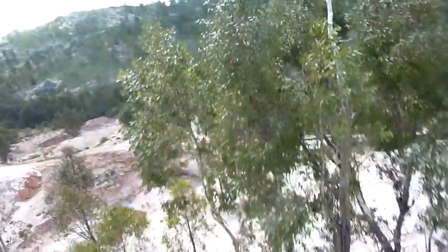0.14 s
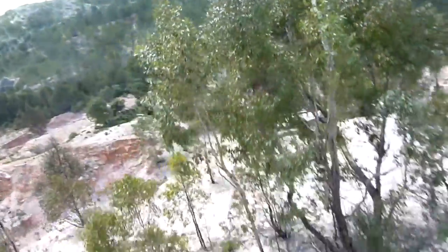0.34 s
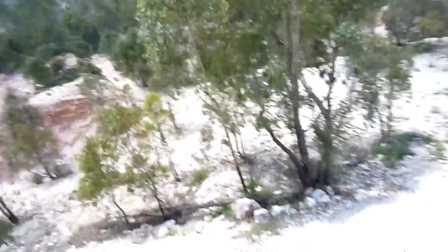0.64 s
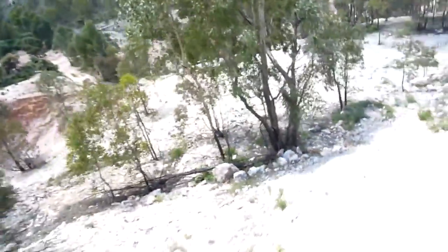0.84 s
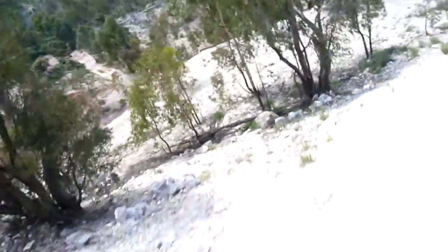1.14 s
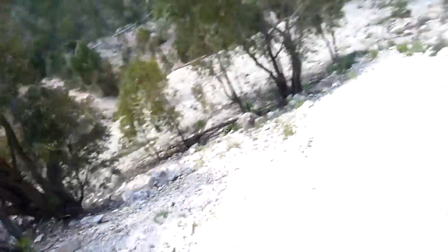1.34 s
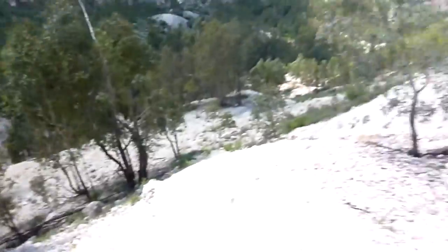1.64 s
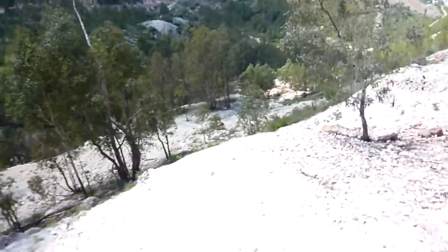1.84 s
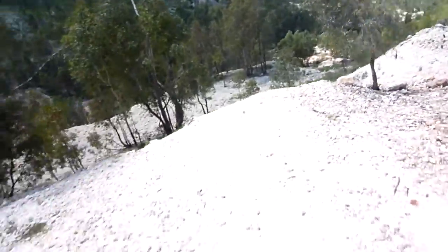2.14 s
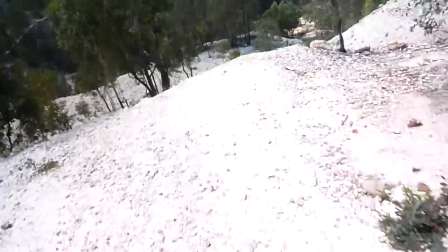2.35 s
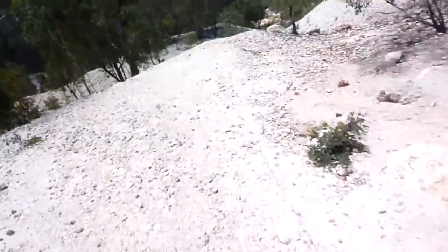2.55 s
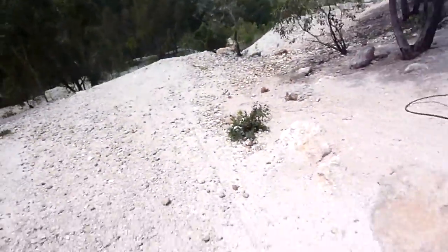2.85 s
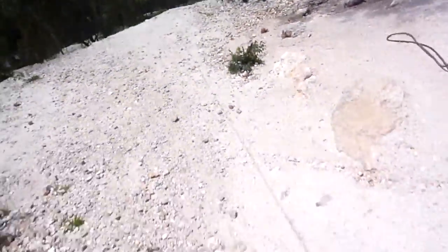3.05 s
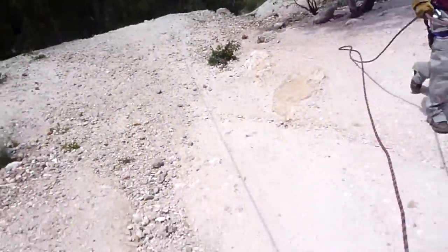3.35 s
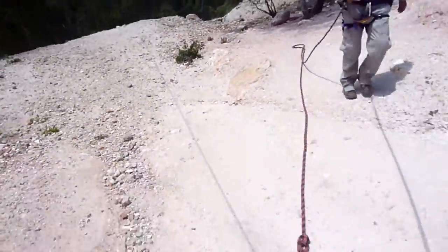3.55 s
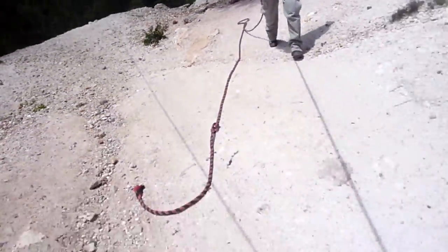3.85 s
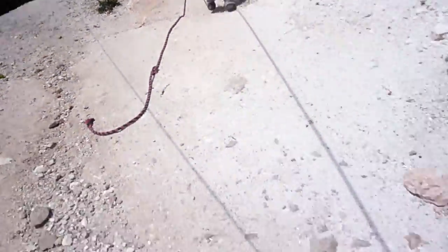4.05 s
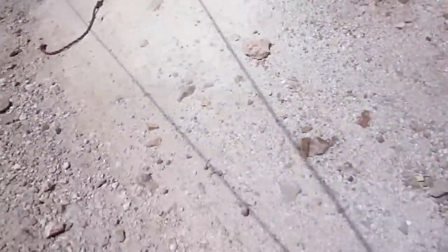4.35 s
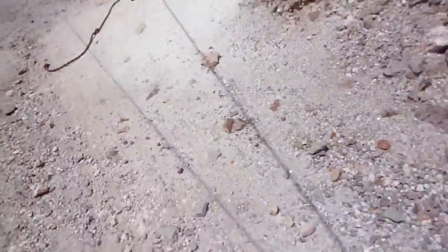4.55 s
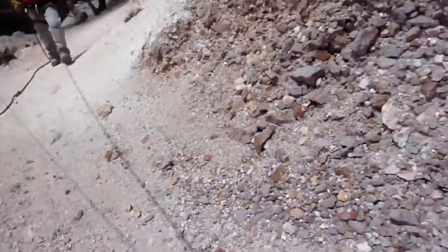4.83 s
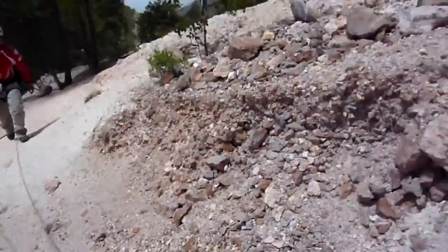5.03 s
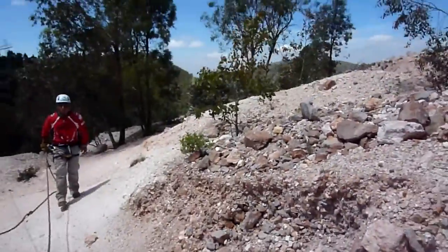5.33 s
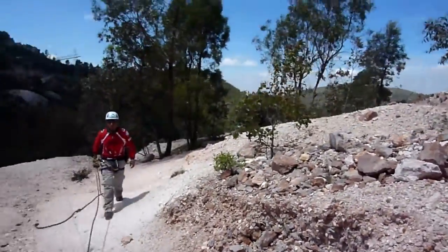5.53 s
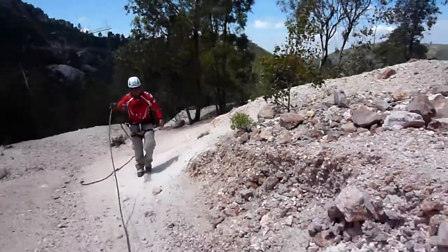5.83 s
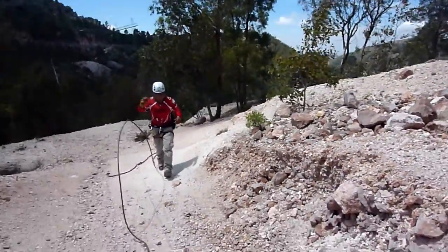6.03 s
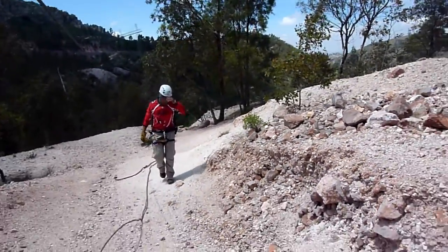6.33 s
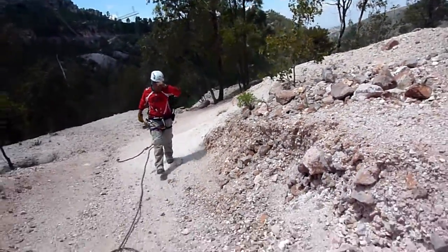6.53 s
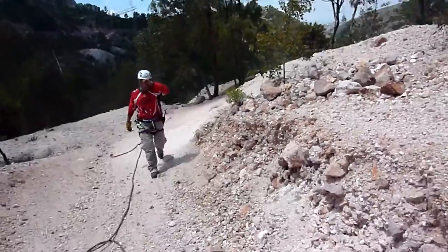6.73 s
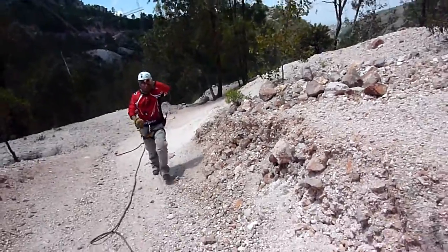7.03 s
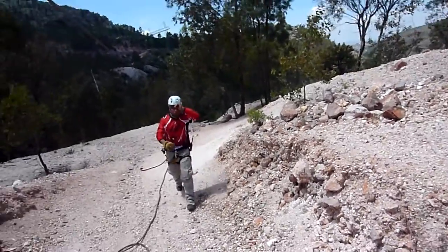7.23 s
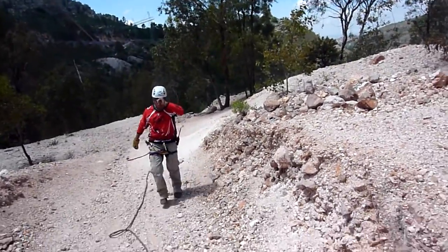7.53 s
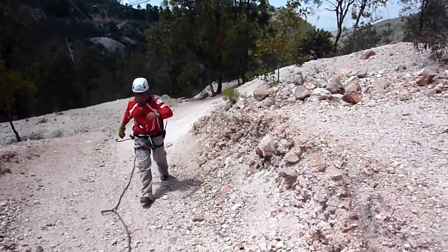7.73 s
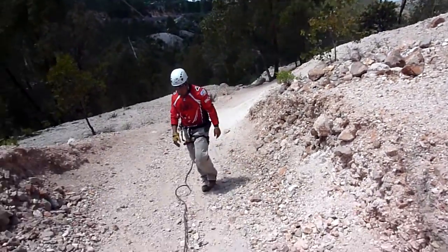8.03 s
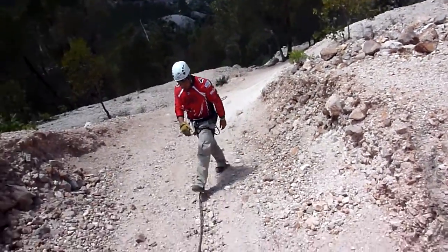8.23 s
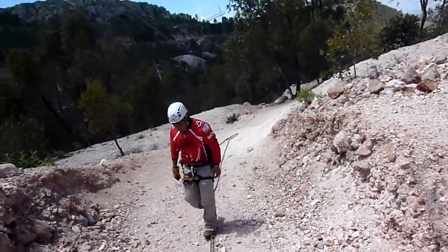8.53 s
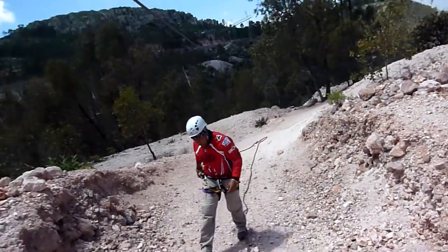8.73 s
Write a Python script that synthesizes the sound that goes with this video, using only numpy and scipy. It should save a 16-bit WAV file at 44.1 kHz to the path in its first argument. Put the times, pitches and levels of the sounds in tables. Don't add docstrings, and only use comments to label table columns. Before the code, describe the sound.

From the start a pulley wheel runs fast along a stranded steel cable just above the microphone: a dense, bright, gritty hiss with a buzzing hum beneath it. Wind gusts thump and flutter on the microphone until about 2.7 s, with short rough puffs around 1.3 to 2 s. The wind then eases and the trolley dominates, its hum falling in pitch as it slows, with thin high metallic singing near 2.5 to 3 s. A slight surge and lag comes around 3.7 s, and small airy flicks at 4.1 to 4.9 s. Faint singing returns near 5 s, then stronger short squeals from 5.9 to 7 s as the hum disappears. Low gusts return after 6 s and grow heavy from 7.3 s. From about 6.7 s sharp dry ticks emerge; after 7 s the hiss is thin and patchy, and irregular clicking continues to the end, close and dry in open air.

```python
import sys
import numpy as np
from scipy import signal
from scipy.fft import rfft, irfft, next_fast_len
from scipy.io import wavfile
from scipy.ndimage import uniform_filter1d, map_coordinates

SR = 44100
rng = np.random.default_rng(int(sys.argv[2]) if len(sys.argv) > 2 else 0)


def master(y):
    cut = np.clip(np.atleast_2d(y).T, -1, 1)
    pcm = np.round(cut * 32767)
    wavfile.write(sys.argv[1], SR, pcm.astype(np.int16))


def attenuation_scalar(level_db):
    decades = np.asarray(level_db, float) / 20
    return 10 ** decades


N = 391608

# start_s, strands_per_s
STRAND_RATE = [(0, 411), (1.15, 385), (1.29, 352), (1.7, 358), (2.12, 345), (2.6, 306), (2.8, 314),
               (3.04, 277), (3.3, 292), (3.52, 262), (3.89, 250), (4.04, 222), (4.5, 210), (4.89, 150),
               (5.2, 144), (5.33, 124), (5.81, 124), (6.1, 105)]
# pitch_hz, width_hz, level_db
CABLE_MODES = [(1610, 220, 0)]
CHEEK_MODES = [(2595, 560, 5.5), (3288, 690, 10.5), (4260, 720, -0.5)]
SHEAVE_MODES = [(5123, 780, 1), (6320, 550, 3.5), (6990, 1150, 1.5), (9070, 890, -1), (10170, 670, -6.5)]
RIM_MODES = [(10100, 2800, -2.5), (12200, 1350, 1), (14200, 1500, -4.5)]
STRAP_MODES = [(610, 240, 4.5), (1180, 486, 10.5)]


def unit(x):
    return x / np.sqrt(np.mean(x ** 2) + 1e-20)


def along(points, hz):
    f, v = np.transpose(points)
    return np.interp(np.log(hz + 1), np.log(f + 1), v)


def curves(rows):
    s, *cols = np.transpose(rows)
    return [np.interp(np.arange(N) / SR, s, c) for c in cols]


def wobble(rate):
    knots = rng.standard_normal(int(N * rate / SR) + 4)
    return map_coordinates(knots, [np.arange(N) * rate / SR])


def bumps(rows):
    t = np.arange(N) / SR
    return sum(size * np.exp(-((t - s) / width) ** 2) for s, width, size in rows)


def bursts(rows, rise_db, fall_db):
    t = np.arange(0, N, 32) / SR
    s, length, db, *over = np.transpose(rows)[:, :, None]
    early = np.maximum(s - t, 0)
    late = np.maximum(t - s - np.abs(length), 0)
    level = db - rise_db * early - fall_db * late
    return [np.interp(np.arange(N) / SR, t, np.max(level + more, axis=0)) for more in [0, *over]]


def filtered(x, response):
    m = next_fast_len(N + SR // 4)
    return irfft(rfft(x, m) * response(np.fft.rfftfreq(m, 1 / SR)), m)[..., :N]


def resonant(modes):
    low = 0.67 * modes[0][0]

    def response(f):
        ring = sum((-1) ** k * attenuation_scalar(db) * 1j * f * w / (c * c - f * f + 1j * f * w)
                   for k, (c, w, db) in enumerate(modes))
        return (1j * f / (low + 1j * f)) ** 2 * ring
    return response


def patchy(x, depth_db):
    z = signal.stft(x, nperseg=512)[2]
    field = uniform_filter1d(rng.standard_normal(z.shape), size=6, axis=0)
    field = uniform_filter1d(field, size=60, axis=1)
    return signal.istft(z * attenuation_scalar(depth_db * unit(field)), nperseg=512)[1][:N]


def gusts(spectrum, lumps):
    noise = rng.standard_normal((2, N)) + 0.45 * rng.standard_normal(N)
    return unit(lumps * filtered(noise, lambda f: attenuation_scalar(along(spectrum, f))))


def puffs():
    # start_s, peak_db, pitch_hz
    eddies = [(0.419, -45, 264), (1.346, -14.5, 264), (1.609, -9.5, 283), (1.913, -7, 268),
              (4.13, -28.5, 301), (4.18, -25, 373), (4.27, -20.5, 410), (4.402, -16, 471),
              (4.448, -18, 708), (4.62, -11.5, 584), (4.718, -16.5, 605), (4.922, -29, 404),
              (6.692, -14.5, 500), (7.42, -12.5, 374), (7.775, -8, 363)]
    size = SR // 8
    t, f = np.arange(size) / SR, np.fft.rfftfreq(size, 1 / SR)
    out = np.zeros((2, N + size))
    for (s, db, hz), noise in zip(eddies, rng.standard_normal((len(eddies), 2, size))):
        note = irfft(rfft(noise) / (1 + (np.log(f / hz + 1e-3) / 0.42) ** 4), size)
        swell = (t / 0.0081) * np.exp(1 - t / 0.0065)
        out[:, round(s * SR):][:, :size] += attenuation_scalar(db - 6.5) * unit(note) * swell
    return out[:, :N]


def wind():
    # start_s, length_s, buffet_db, flutter_over_buffet_db
    gust_rows = [(0, .66, -27, -1), (.72, .25, -26, -2), (1.05, .08, -30.5, -5), (1.35, 0.0071, -26, -7.5),
                 (1.48, 0.0078, -32, -14), (1.6, 0.042, -28.5, -8.5), (1.71, 0.11, -28.5, -3),
                 (1.9, 0.067, -27.5, -2), (2.0, 0.02, -41, 2), (2.21, 0.018, -31.5, -5.5),
                 (2.31, 0.018, -32, -6), (2.42, 0.034, -26, -9), (2.59, 0.17, -35, -5.5),
                 (3.1, 0.28, -44.5, -9.5), (4.14, 0.15, -55.5, 15.5), (4.4, 0.045, -52, 17),
                 (4.61, 0.15, -49.5, 12.5), (6.0, 0.26, -41.5, -12), (6.17, 0.15, -28.5, -13),
                 (6.38, 0.56, -26.5, -11.5), (7.27, 0.061, -25.5, -17), (7.36, 0.12, -29, -9),
                 (7.55, 0.14, -22, -12), (7.73, 0.16, -19.5, -11), (7.95, 0.094, -28, -19),
                 (8.17, .17, -21.5, -16.5), (8.36, 0.021, -15.5, -18.5), (8.42, 0.28, -25.5, -18.5),
                 (8.82, 0.07, -24.5, -16)]
    # start_s, buffet_db, flutter_db
    lull = [(0, -36, -52), (1.5, -42, -67), (2.8, -71, -67), (3.6, -60, -67), (4.9, -58, -47.5),
            (5.8, -53, -49), (8.88, -32, -53)]
    # pitch_hz, level_db_per_hz
    buffet = [(12, -50), (20, -21), (65, -0.5), (108, 3), (252, -1.5), (372, -14.5), (500, -29), (650, -63),
              (1100, -120)]
    flutter = [(100, -25), (220, -3.5), (350, 1), (600, -7), (1000, -16.5), (1800, -26.5), (4000, -35)]
    # start_s, left_minus_right_db
    wind_side = [(0.0, 4.5), (0.67, -2.5), (0.89, 4.5), (2.17, -0.5), (2.47, 2), (2.77, -4.5), (5.86, 0.5),
                 (6.35, -10), (6.95, -2), (7.52, -9), (8.06, 1), (8.73, -10), (8.88, -2)]
    gust_db = bursts(gust_rows, rise_db=397, fall_db=265)
    buffet_db, flutter_db = np.maximum(gust_db, curves(lull))
    eddy = 0.12 * wobble(30) + 0.56 * np.array([wobble(35), wobble(35)])
    low = gusts(buffet, attenuation_scalar(3.5 * eddy))
    high = gusts(flutter, attenuation_scalar(np.minimum(4 * eddy + 3 * wobble(80), 7)))
    lean = attenuation_scalar(np.array([[.5], [-.5]]) * curves(wind_side)[0])
    rumble = attenuation_scalar(-51) * gusts([(20, 0), (60, -3), (150, -14), (400, -40)], attenuation_scalar(3 * wobble(8)))
    return lean * (attenuation_scalar(buffet_db + 1.5) * low + attenuation_scalar(flutter_db + 1.5) * high) + rumble + puffs()


def slowing():
    fastest, slowest = STRAND_RATE[0][1], STRAND_RATE[-1][1]
    return 1 - (curves(STRAND_RATE)[0] - slowest) / (fastest - slowest)


def strand_rate():
    # centre_s, half_width_s, strands_per_s
    swings = [
        (.66, .2, 5),
        (1.45, .08, 8),
        (3.13, .04, 10),
        (3.2, .04, -13),
        (3.65, .07, 55),
        (3.77, .05, -34),
        (5.45, .06, 6),
    ]
    return curves(STRAND_RATE)[0] + bumps(swings)


def strand_phase():
    return np.cumsum(strand_rate() * (1 + .007 * wobble(14))) / SR


def singing():
    # start_s, length_s, level_db, lower_line_over_db, upper_line_over_db
    burst_rows = [(2.48, .05, -50.5, -4, 14), (2.56, 0.078, -47, 3, 4), (2.7, 0.13, -37.5, 0, -2),
                  (2.84, 0.053, -36.5, 8, 0), (2.93, 0.1, -43, 4, 11), (4.98, 0.31, -55, -1, 11),
                  (5.26, 0.063, -53, -3, 7), (5.85, .05, -37, 4, -4), (5.94, 0.047, -28, -2, -11),
                  (6.13, .06, -41, 4, -4), (6.21, 0.029, -35, 11, 0), (6.3, 0.061, -25, -2, -25),
                  (6.45, 0.025, -31, -6, -23), (6.55, .08, -28, 0, -11), (6.66, 0.082, -26.5, 3, -13),
                  (6.8, 0.066, -29, -6, -20), (6.92, .02, -31, -12, -19), (6.98, 0.028, -32, -7, -26)]
    # pitch_hz, level_db
    lines = [
        [(7698, -1)],
        [(6955, -2.5)],
        [(9812, 7), (14600, -7), (15032, -7)],
        [(12875, 21.5)],
    ]
    main, lower, upper = bursts(burst_rows, rise_db=215, fall_db=215)
    top = np.minimum(main + 2, -50 + 0.79 * (main + 40) - 18.5 * slowing())
    t, drag = np.arange(N) / SR, wobble(55)
    out = np.zeros(N)
    for level, group in zip((main, lower, upper, top), lines):
        for hz, db in group:
            gain = attenuation_scalar(level + db + .8 + 4 * drag + 2.5 * wobble(70))
            out += gain * np.sin(2 * np.pi * hz * t + 1.6 * wobble(45))
    return out


def hum(turns):
    # multiple, level_db
    overtones = [(2, -10), (3, -6), (4, -2), (5, -9)]
    rate = strand_rate()
    peak_rate = 285
    steepness = np.where(rate > peak_rate, 1.2, .35)
    whine_db = -45.5 - 16 * np.log2(rate / peak_rate) ** 2 * steepness
    over = np.zeros(N)
    for k, db in overtones:
        hz = k * rate
        carry_db = -3.5 * np.log2(hz / 1120) ** 2 - np.maximum(hz - 1220, 0) / 35
        over += attenuation_scalar(whine_db + db + carry_db + 2.2 * wobble(11)) * np.sin(2 * np.pi * k * turns)
    low_db = -56.5 - np.maximum(rate - 300, 0) / 8 + 2.5 * wobble(9)
    low = attenuation_scalar(low_db) * np.sin(2 * np.pi * turns)
    fade = np.clip(6.2 - np.arange(N) / SR, 0, .2) / .2
    return np.sqrt(2) * fade * (low + over)


def knocks():
    # start_s, strands_passed, peak_db
    creep = [(7.0151, 0, -18), (7.1197, 4, -13), (7.271, 10, -17), (7.423, 15, -17), (7.4548, 16, -12),
             (7.6167, 24, -16), (7.6631, 26, -18), (7.7904, 30, -17), (7.8951, 33, -20), (8.022, 38, -16),
             (8.0602, 39, -14), (8.159, 40, -16), (8.3027, 43, -20), (8.3448, 44, -17), (8.4613, 48, -16),
             (8.5695, 51, -15), (8.6878, 55, -16), (8.8596, 62, -17)]
    # start_s, peak_db
    strays = [(6.7178, -16), (6.7826, -20), (6.8275, -18), (6.8699, -20), (6.9263, -13), (6.9752, -13),
              (6.994, -15), (7.1029, -39), (7.705, -21), (8.0108, -14), (8.0877, -17), (8.1191, -24),
              (8.1366, -11), (8.6692, -11)]
    s, passed, db = np.transpose(creep)
    half = np.arange(2 * passed[-1] + 1) / 2
    trailing_db = -10 * (half % 1 > 0)
    paced_db = np.interp(half, passed, db) + trailing_db + 1.2 * rng.standard_normal(len(half))
    return strays + list(zip(np.interp(half, passed, s), paced_db))


def ticks():
    size, rows = SR // 25, knocks()
    t, f = np.arange(size) / SR, np.fft.rfftfreq(size, 1 / SR)
    knock = resonant(SHEAVE_MODES)(f) - attenuation_scalar(-10) * resonant(CHEEK_MODES)(f)
    knock = knock + attenuation_scalar(-16) * (resonant(STRAP_MODES)(f) - resonant(CABLE_MODES)(f))
    knock = knock - attenuation_scalar(-7) * resonant(RIM_MODES)(f)
    fall = attenuation_scalar(-60 * t / .003) + attenuation_scalar(-11 - 60 * t / .025)
    rattle = fall * rng.standard_normal((len(rows), size)) + 5 * (t == 0)
    blows = irfft(rfft(rattle) * knock, size)
    out = np.zeros(N + size)
    for (s, db), blow in zip(rows, blows):
        out[round(s * SR):][:size] += attenuation_scalar(db) * blow / np.abs(blow).max()
    return out[:N]


def grit(turns, spread_db):
    # start_s, contacts_per_s, smooth_share
    contacts = [(0, 1460, 1.44), (5.8, 750, 0.98), (6.3, 600, .8), (7.1, 600, .7), (8.88, 600, .7)]
    density, smooth = curves(contacts)
    hit_db = spread_db * np.minimum(rng.exponential(size=N), 2.6)
    hits = (rng.random(N) < density / SR) * attenuation_scalar(hit_db)
    decay = attenuation_scalar(-60 * np.arange(SR // 50) / SR / 0.0025)
    scrape = signal.fftconvolve(hits, decay)[:N] * rng.standard_normal(N)
    scrape /= np.sqrt(np.abs(uniform_filter1d(scrape ** 2, size=SR // 4)) + 1e-9)
    bunch = 1 + 0.15 * np.cos(2 * np.pi * turns)
    uneven = attenuation_scalar(0.68 * wobble(35) + 0.14 * wobble(76))
    return bunch * uneven * (scrape + smooth * rng.standard_normal(N)) / np.hypot(1, smooth)


def rolling(turns):
    # start_s, hiss_db
    load = [(0, -27), (1.1, -28), (1.64, -24.5), (3.0, -24), (3.6, -22.5), (4.1, -27), (4.5, -24.5),
            (4.9, -29.5), (5.65, -23), (6.08, -29), (6.25, -29.5), (6.8, -30), (7.07, -38.5), (7.75, -44),
            (8.0, -35), (8.23, -54), (8.6, -46.5), (8.88, -37)]
    # centre_s, half_width_s, level_db
    level_changes = [(.65, .12, 1), (2.028, 0.0078, -7.5), (2.09, 0.037, 3), (2.188, 0.018, -4.5), (2.22, .015, 3),
                     (2.31, 0.022, 3), (3.64, .05, 1), (3.74, 0.066, -2.5), (3.89, 0.064, 2), (4.63, .06, -1),
                     (5.27, 0.045, -0.5), (5.96, 0.051, -3), (6.22, 0.056, 6), (6.31, .02, 2), (6.41, 0.02, -4.5),
                     (6.48, .02, 0), (6.74, 0.013, -1), (7.2, 0.022, 7), (7.54, 0.14, 10.5), (8.38, 0.1, 9.5),
                     (8.67, 0.11, 9.5)]
    # start_s, share_0_to_1
    swung_under = [(0, 0.1), (1.2, 0.2), (3.0, 0.26), (4.6, 1), (4.9, 1), (5.7, 0.57), (6.8, .45),
                   (7.6, 0.74), (8.88, 1)]
    # pitch_hz, width_hz, level_db
    hanger_modes = [(2200, 590, 0)]
    slow, (under,) = slowing(), curves(swung_under)
    cheek_db = -8.5 + 8 * slow + 0.5 * under
    strap_db = -23.5 + 14 * slow + 7.5 * under
    hanger_db = -18.5 + 0.5 * slow + 14 * under
    cable_db = -5.5 - 36.5 * (slow - 0.67) ** 2
    rim_db = -7.5 - 4.5 * slow ** 3
    shared = grit(turns, spread_db=4.5)

    def part(modes, own):
        shake = patchy(shared + own * rng.standard_normal(N), 0.94)
        return unit(filtered(shake, resonant(modes)))

    low = attenuation_scalar(cable_db) * part(CABLE_MODES, own=4.1)
    low += attenuation_scalar(hanger_db) * part(hanger_modes, own=1.6)
    low += attenuation_scalar(strap_db) * part(STRAP_MODES, own=0.64)
    body = part(SHEAVE_MODES, own=0.52) + attenuation_scalar(cheek_db - 6.0) * part(CHEEK_MODES, own=0.84) + attenuation_scalar(-5.0) * low
    rim = attenuation_scalar(1.3 * wobble(35.7) + rim_db) * part(RIM_MODES, own=0.37)
    return attenuation_scalar(curves(load)[0] + 1.45 + bumps(level_changes)) * (body + rim)


def ports(x):
    # pitch_hz, likeness_0_to_1
    alike = [(700, 1), (1500, 1), (4000, 1), (8000, 0.83), (13000, 0.62)]
    # pitch_hz, left_minus_right_db
    balance = [(700, 0), (2400, -0.5), (4400, -2), (8100, -2), (15000, 2.5)]
    z = signal.stft(x, nperseg=128)[2]
    random_phase = np.exp(2j * np.pi * rng.random(z.shape))
    scattered = 0.85 * signal.istft(z * random_phase, nperseg=128)[1][:N]

    def turn(f):
        return np.arccos(np.clip(along(alike, f), 0, 1)) / 2

    side = np.array([[1], [-1]])

    def lean(f):
        lead = np.exp(side * 1j * np.pi * f * 1.17 / SR)
        return attenuation_scalar(side * along(balance, f) / 2) * lead

    common = filtered(x, lambda f: np.cos(turn(f)))
    differing = filtered(scattered, lambda f: np.sin(turn(f)))
    return filtered(common + side * differing, lean)


def scene():
    turns = strand_phase()
    trolley = hum(turns) + rolling(turns) + ticks() + singing()
    return ports(trolley) + wind()


def low_pass(x):
    return signal.sosfilt(signal.butter(12, 16500, fs=SR, output="sos"), x)


def record(dry):
    soft = dry / (1 + np.abs(dry / .8) ** 4) ** .25

    def housing(f):
        dip = 1 - .8 / (1 + ((f - 7910) / 80) ** 2)
        return dip * (f < 15750) / np.sqrt(1 + (f / 13500) ** 6)

    return low_pass(filtered(soft, housing))


dry = scene()
out = record(dry)
master(out)
```